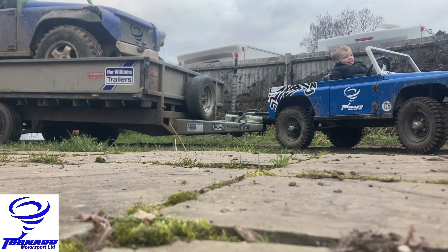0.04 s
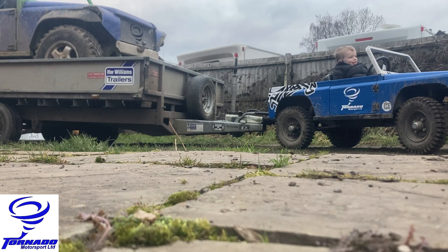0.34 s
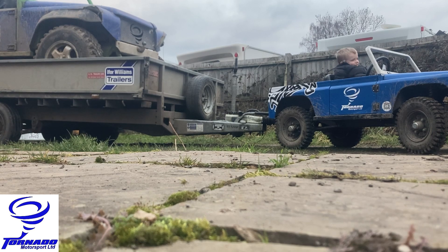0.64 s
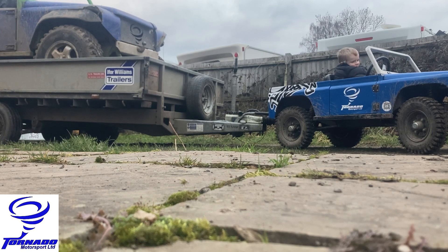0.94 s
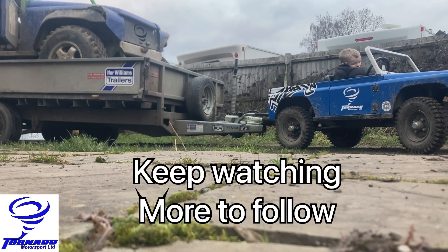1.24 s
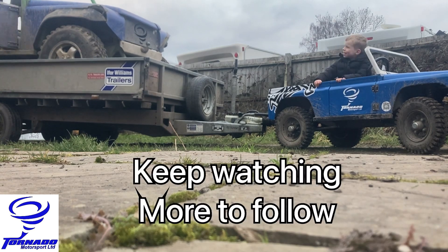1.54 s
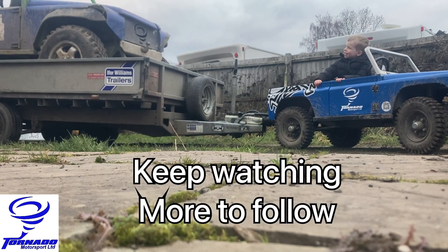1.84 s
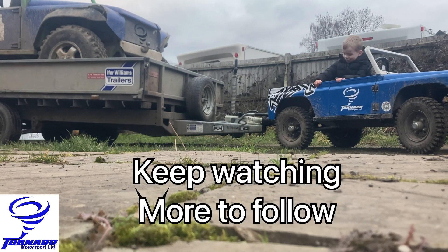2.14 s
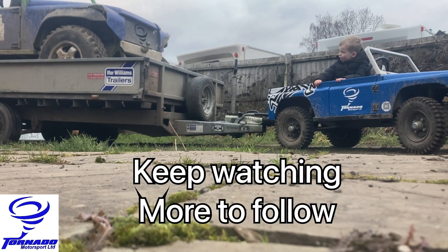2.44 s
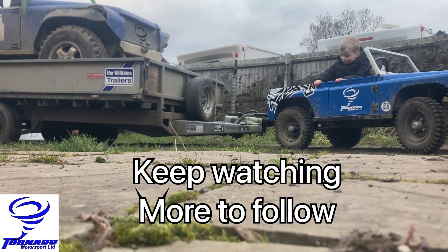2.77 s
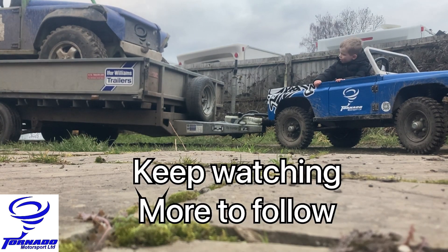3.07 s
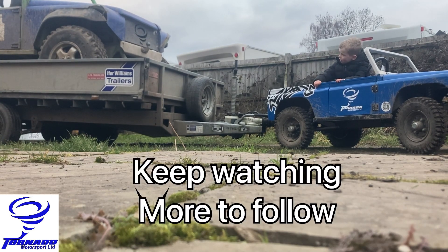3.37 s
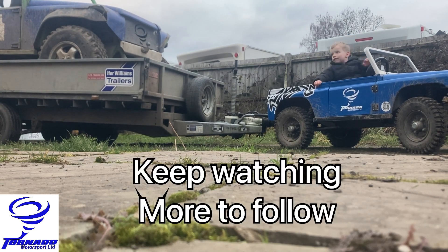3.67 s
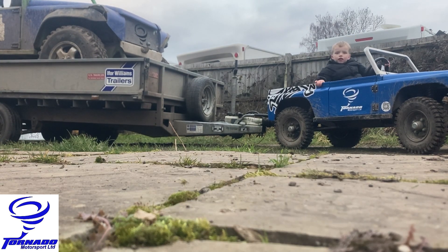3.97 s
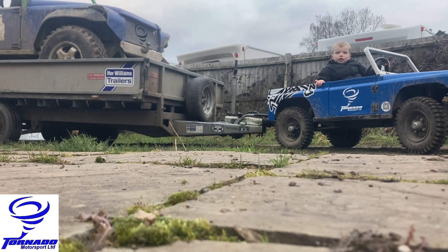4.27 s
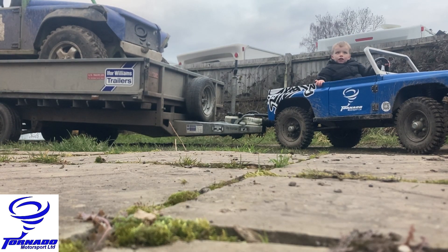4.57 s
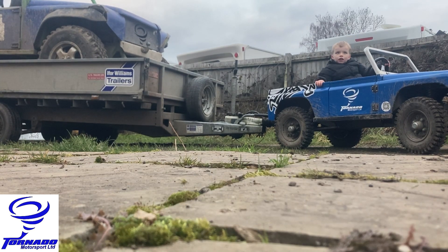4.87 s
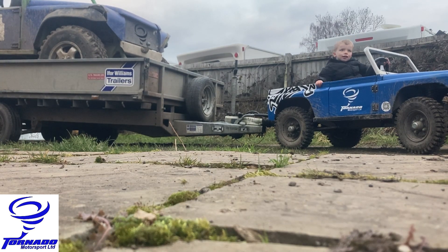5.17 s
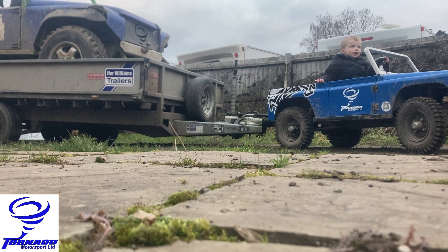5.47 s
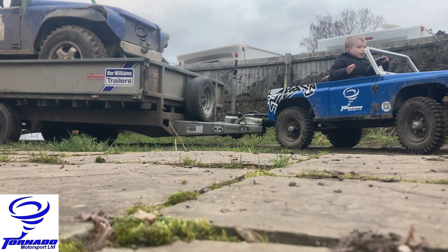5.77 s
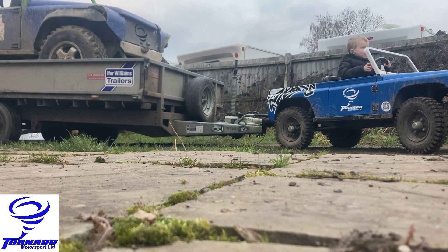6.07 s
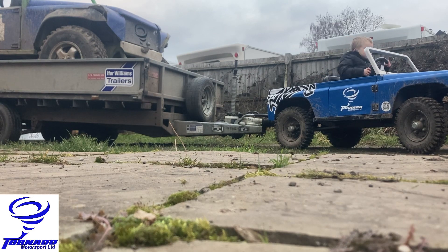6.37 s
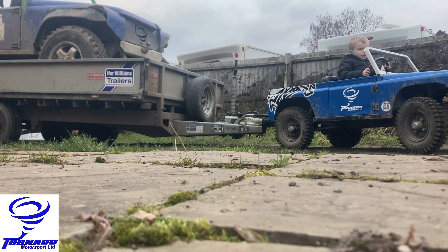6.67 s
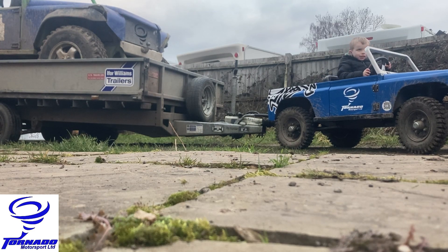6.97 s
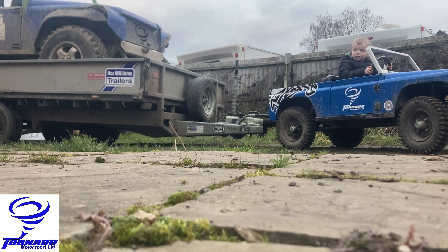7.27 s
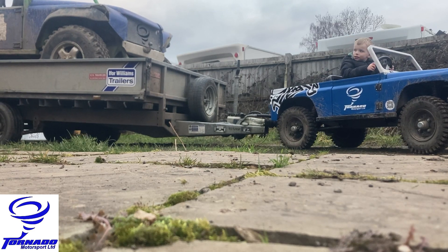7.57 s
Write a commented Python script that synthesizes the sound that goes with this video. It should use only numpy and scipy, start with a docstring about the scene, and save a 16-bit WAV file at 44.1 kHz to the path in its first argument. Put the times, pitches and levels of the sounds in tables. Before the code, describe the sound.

Outdoors, a clattering engine slows and dies with a brief squeal of dry metal. Small close clicks and squeaks follow, broken by a moment of total silence. A trailer hitch closes with a loud ringing clank and a grinding latch. Soft thumps, hollow knocks and scrapes come from a child's ride-on car against a low outdoor rumble. Finally it pulls away, gears humming and ticking, tyres crackling on gritty paving.

```python
"""An engine idles in a paved yard, is switched off, slows down and stops with a screech of dry metal.
Keys and catches click close by over a thin hiss, and early on all sound drops out for a moment.
A steel coupling clanks shut and its latch grinds home. Then, in the murmur of open air, come hollow
knocks, thumps and scuffs on the panels of a small ride-on car. Last, its electric motor takes up
the load of a trailer: the gears tick and hum, and the tyres crunch over grit."""
import sys
import numpy as np
from scipy import signal
from scipy.fft import rfft, irfft
from scipy.io import wavfile
from scipy.ndimage import uniform_filter1d

SR = 44100
rng = np.random.default_rng(int(sys.argv[2]) if len(sys.argv) > 2 else 0)


def inscribe(sig):
    """Save sig as 16-bit PCM at rate SR to the path in sys.argv[1].

    A 1-D sig is mono; a 2-D sig holds one channel per row.
    Samples are clipped to [-1, 1] before scaling.
    """
    pcm = np.round(np.clip(np.atleast_2d(sig).T, -1, 1) * 32767)
    wavfile.write(sys.argv[1], SR, pcm.astype(np.int16))


N = 336042
TIME, HZ = np.arange(N) / SR, np.fft.rfftfreq(N, 1 / SR)

# A fade_s is the time a sound takes to fall by 60 dB. Bass and treble are relative to the level.
# Puff strength of the four cylinders in turn: level_db
CYLINDERS = [-8, -18, -6.5, -14]
# Tone of the exhaust puffs: pitch_hz, level_db
EXHAUST_TONE = [(25, -23.5), (57, -6.5), (86, 7), (112, -6), (145, -1), (195, -14), (287, -13), (480, -17),
                (2000, -89)]
# Tone of the clattering engine block: pitch_hz, level_db
CLATTER_TONE = [(60, -7), (300, 7.5), (600, -2), (1200, -2), (1900, -5.5), (2600, -10.5), (3800, -15),
                (5700, -31.5), (8000, -24.5), (16000, -49)]
# Tone of the ticking valves: pitch_hz, level_db
VALVE_TONE = [(4000, -41), (9000, -18), (10000, -5), (11800, -6), (13200, -19), (16000, -23.5)]
# Hollow drone of the exhaust pipe as the engine slows: time_s, level_db
PIPE_DRONE = [(0.35, -39), (0.6, -38.5), (0.72, -38.5), (0.81, -51), (0.88, -35.5), (1.0, -54)]
# Ringing bands of dry, rubbing metal: pitch_hz, width_hz, level_db
SCREECH_BANDS = [(836, 120, -14), (1570, 680, -10), (2770, 310, -8.5), (3240, 490, 4), (4350, 410, -5.5),
                 (4870, 1200, -12.5), (9800, 13800, -9.5)]
# Tone of the thin background hiss: pitch_hz, level_db
HISS_TONE = [(59, -96), (100, -50.5), (239, -16), (535, -1), (1080, -12.5), (6990, -20), (12100, -34.5),
             (14700, -29), (16000, -40)]
# Keys, catches and a ratchet's teeth: start_s, level_db, treble_db, fade_s
CLICKS = [(1.0063, -37, -4, 0.2), (1.066, -36, -8, 0.54), (1.3802, -29.5, -0.5, 0.24),
          (1.4126, -32.5, -17, 0.18), (1.4557, -28.5, -8.5, 0.16), (1.473, -41.5, 7, 0.04),
          (1.5214, -31, -10.5, 0.1), (1.676, -33, -14, 0.24), (1.6996, -20.5, 5.5, 0.028),
          (1.7021, -21.5, 1.5, 0.041), (2.4814, -45.5, 4, 0.061), (2.5265, -36, -11.5, 0.22),
          (2.7928, -37.5, 2, 0.069), (3.183, -33.5, -0.5, 0.55), (3.538, -42, -2, 0.1),
          (3.6011, -30, -2.5, 0.05), (3.7197, -30, -11, 0.033), (3.728, -32.5, -20, 0.083),
          (3.7836, -34.5, -19, 0.1), (3.8595, -27, -32, 0.052), (3.927, -34.5, -26, 0.029),
          (3.9382, -29.5, -17.5, 0.047)]
# Short squeaks of dry metal: start_s, length_s, pitch_hz, level_db
SQUEAKS = [(1.049, 0.083, 1406, -41.5), (1.6, 0.02, 8900, -40), (1.645, 0.025, 3150, -39),
           (1.646, 0.021, 6260, -32), (1.672, 0.071, 982, -36), (2.893, 0.052, 1450, -27.5)]
# Blows on the coupling: start_s, level_db, bass_db, treble_db
COUPLING_BLOWS = [(2.833, -23.5, -9, -8.5), (2.8875, -22.5, -6, 7), (2.946, -10.5, -13.5, 1)]
# Notes the coupling rings with: pitch_hz, level_db, fade_s
COUPLING_NOTES = [(1406, -13, 0.35), (1782, -1.5, 0.17), (1924, -3, 0.16), (2836, 2, 0.22),
                  (3481, -3, 0.17), (3526, -2.5, 0.22), (4530, -16, .75), (5751, -9, 0.22),
                  (5950, -7.5, 0.12), (6420, -4.5, 0.15), (6500, -17, 0.36), (7224, -7, 0.17)]
# Blows of the closing latch: start_s, level_db, bass_db, treble_db
LATCH_BLOWS = [(3.284, -13.5, -7, -1), (3.301, -12.5, -18, -7), (3.318, -12.5, -23.5, -11)]
# Notes the latch rings with: pitch_hz, level_db, fade_s
LATCH_NOTES = [(1297, -25.5, 1.6), (1708, -3, 0.1), (2218, -4, .085), (2392, 2, 0.11), (2640, 3, .1),
               (2778, 1, 0.1), (3074, -5, .12), (3305, -17, .42), (3735, 5, 0.1), (3815, 0, .1)]
# Tone of the open air in the yard: pitch_hz, level_db
AIR_TONE = [(15, -55), (25, -5), (102, -4.5), (285, -14.5), (840, -19), (2000, -33.5), (4030, -44.5),
            (16000, -54.5)]
# Dull thumps of the car body: start_s, level_db, pitch_hz
THUMPS = [(4.077, -38.5, 92), (4.793, -41.5, 112), (5.224, -37.5, 189), (5.424, -24.5, 175.8)]
# Notes within one thump: pitch_multiple, level_db
THUMP_NOTES = [(1, 0), (1.7, -4.5), (2.5, -4), (3.6, -13.5)]
# Knocks on the panels, each spot with its own hollow note: start_s, level_db, treble_db, pitch_hz
KNOCKS = [(4.8303, -56, -5, 2570), (5.214, -48, -12.5, 565), (5.339, -50.5, -15.5, 1460),
          (5.6397, -40.5, -0.5, 1610), (5.8695, -38, -4.5, 1218), (5.9647, -42, -5.5, 1310),
          (6.0415, -32, 0.5, 1164), (6.1475, -43, -11, 1190)]
# Notes that all panel knocks share: pitch_hz, level_db, fade_s
PANEL_NOTES = [(391, -9, 0.28), (439.6, -1, 0.16), (567, -4.5, 0.14), (4310, -6, 0.033), (6910, -3, 0.026)]
# Scuffs on the car body: peak_s, level_db
SCUFFS = [(4.118, -41.5), (4.894, -41.5), (4.929, -47), (6.431, -51.5), (6.52, -46.5), (6.563, -41)]
# Tone of a scuff: pitch_hz, level_db
SCUFF_TONE = [(410, -1.5), (2000, -4), (5270, -10), (8800, -35), (14000, -28)]
# Load on the motor, given as the loudness of the gear hum: time_s, level_db
MOTOR_LOAD = [(6.83, -56), (7.02, -47), (7.08, -38), (7.105, -31), (7.29, -29), (7.345, -47), (7.47, -33),
              (7.52, -34), (7.59, -38)]
# Tone of the rolling car's rumble: pitch_hz, level_db
RUMBLE_TONE = [(24, -43), (40, -20), (290, -8), (420, -10.5), (550, -17.5), (1500, -40.5), (4000, -61),
               (8800, -77)]
# Tone of sand crackling under the tyres: pitch_hz, level_db
SAND_TONE = [(1500, 0), (3700, -1), (5700, -8), (7500, 4), (8800, -14), (10000, 1), (13000, -9),
             (15500, -28)]
# Gear ticks and tyre crunches as the car pulls away: start_s, level_db, treble_db
TICKS_AND_CRUNCHES = [(6.882, -40.5, -14.5), (6.9776, -51, 4), (7.051, -44.5, -1), (7.1255, -39.5, -8),
                      (7.4266, -34, -15.5), (7.5418, -32.5, -10.5), (7.588, -38.5, -2)]

ENGINE_END_S, AIR_START_S = 1.005, 4.076


def amp(db):
    """Turns decibels into a number to multiply a sound by."""
    return 10 ** (np.asarray(db) / 20)


def unit(x):
    """Scales a signal to an average strength (rms) of 1."""
    return x / np.sqrt(np.mean(x ** 2) + 1e-20)


def level_at(tone, hz):
    """The level in dB at any pitch, filled in between the rows of a tone table."""
    pitches, db = np.transpose(tone)
    return np.interp(np.log(hz + 1), np.log(pitches + 1), db)


def add(mix, start_s, sound):
    """Mixes a sound in at the given time."""
    part = mix[max(round(start_s * SR), 0):][:len(sound)]
    part += sound[:len(part)]


def colour(x, tone, size=4096):
    """Filters a sound to the given tone without smearing it earlier in time."""
    db = np.maximum(level_at(tone, abs(np.fft.fftfreq(size, 1 / SR))), -100)
    taps = np.fft.ifft(np.exp(np.conj(signal.hilbert(np.log(amp(db)))))).real
    return signal.oaconvolve(x, taps)[:len(x)]


def noise(tone):
    """Steady noise with the given tone."""
    return unit(irfft(rfft(rng.standard_normal(N)) * amp(level_at(tone, HZ)), N))


def wander(rate_hz):
    """A smooth random wobble, up to about the given rate."""
    return unit(irfft(rfft(rng.standard_normal(N)) * np.exp(-(HZ / rate_hz) ** 2), N))


def rasp(grain_db, rate_hz):
    """Noise broken into uneven grains."""
    return unit(rng.standard_normal(N) * amp(grain_db * wander(rate_hz)))


def resonate(x, hz, width_hz):
    """Makes a sound ring around a pitch that may move over time."""
    turn = np.exp(2j * np.pi * np.cumsum(hz) / SR)
    decay = np.exp(-np.pi * width_hz / SR)
    return unit((turn * signal.lfilter([1], [1, -2 * decay, decay * decay], x / turn)).real)


def place(x, lag_ms, left_db, echo_db, fade_s):
    """Puts a sound in stereo with scattered echoes; the right side hears it lag_ms later."""
    t = TIME[:SR // 2]
    tails = rng.standard_normal((2, len(t))) * amp(-60 * t / fade_s) * (t > .002)
    echoes = signal.oaconvolve(x[None], tails / np.linalg.norm(tails[0]), axes=1)[:, :N]
    right = irfft(rfft(x) * np.exp(-2j * np.pi * HZ * lag_ms / 1000), N)
    return (np.array([x, right]) + amp(echo_db) * echoes) * amp([[left_db / 2], [-left_db / 2]])


def firing_sounds(firings, off_s, uneven_db, block_fade_s=.045):
    """Each firing puffs into the exhaust and knocks the engine block in its cylinder's own way."""
    starts = np.flatnonzero(np.diff(np.floor(firings)))
    sizes = amp(uneven_db * rng.standard_normal(N)[:len(starts)])
    puffs, block, t = np.zeros(N), np.zeros(N), TIME[:SR // 10]
    for k, db in enumerate(CYLINDERS):
        pulses = np.zeros(N)
        pulses[starts[k::len(CYLINDERS)]] = sizes[k::len(CYLINDERS)]
        puffs += amp(db) * pulses
        knock = rng.standard_normal(len(t)) * amp(-60 * t / block_fade_s)
        block += signal.oaconvolve(pulses, knock)[:N]
    puffs, block = colour(puffs, EXHAUST_TONE), colour(block, CLATTER_TONE)
    return puffs / puffs[TIME < off_s].std(), block / block[TIME < off_s].std()


def engine(off_s=0.35, idle_hz=28.5, slowing_hz_per_s=17.5, lurch_hz=16.6, uneven_db=0.5):
    """The engine puffs, clatters and ticks; switched off, it chugs against the air it squeezes."""
    coast_s, running = np.maximum(TIME - off_s, 0), TIME < ENGINE_END_S
    turns_per_s = np.maximum(idle_hz - slowing_hz_per_s * coast_s, 0)
    firings = np.cumsum(2 * turns_per_s) / SR + .55  # two firings a turn
    puffs, block = firing_sounds(firings, off_s, uneven_db)
    lurch_db = 3 * np.cos(2 * np.pi * lurch_hz * coast_s) * np.minimum(coast_s * lurch_hz, 1)
    exhaust_gain = running * amp(-23 - 33.5 * coast_s + lurch_db)
    clatter_gain = running * amp(-28 - 15 * (1 - np.exp(-coast_s / 0.16)) + lurch_db)

    # without fuel the firm puffs give way to a loose shudder
    rough = np.interp(coast_s, [0, .12], [.35, 1.4])
    boom = (0.81 * puffs + rough * noise(EXHAUST_TONE)) / np.hypot(1, rough)
    drone_gain = running * (coast_s > 0) * amp(np.interp(TIME, *np.transpose(PIPE_DRONE)))
    drone = drone_gain * resonate(boom, hz=141 * (1 + 0.11 * wander(idle_hz)), width_hz=50)
    exhaust = place(exhaust_gain * boom + drone, lag_ms=0.188, left_db=.6, echo_db=-31, fade_s=0.21)

    # once a firing, loose parts shake and a valve snaps shut
    force = amp(uneven_db * wander(idle_hz))
    shake = force * (0.79 + np.exp(-(firings % 1) / 0.49))
    loose = 1.08 + rough
    rattle = (block + loose * shake * noise(CLATTER_TONE)) / np.hypot(1, loose)
    snaps = .15 + force * np.exp(-coast_s / .25) * np.exp(-((firings + .3) % 1) / .24)
    peak = clatter_gain.max()
    tick_gain = amp(-8) * peak * (clatter_gain / peak) ** 0.61
    clatter = clatter_gain * rattle + tick_gain * snaps * noise(VALVE_TONE)
    return exhaust + place(clatter, lag_ms=0.17, left_db=2.1, echo_db=-9, fade_s=0.15)


def screech(start_s=0.901, length_s=0.094, level_db=-21.5, sag=0.03):
    """Dry metal rubs as the engine comes to rest; its ringing wavers and sinks."""
    progress = np.clip((TIME - start_s) / length_s, 0, 1)
    judder = rasp(grain_db=4.5, rate_hz=350)
    rub = sum(amp(db) * resonate(judder, hz * (1 - sag * progress + 0.033 * wander(97)), width_hz)
              for hz, width_hz, db in SCREECH_BANDS)
    swell = amp(level_db) * progress ** 0.13 * (1 - progress ** 2)
    return place(swell * unit(rub), lag_ms=0.1, left_db=0.79, echo_db=-1.4, fade_s=0.068)


def thin_hiss(level_db=-52):
    """A faint, steady hiss lies under the clicks."""
    hiss = amp(level_db) * noise(HISS_TONE) * (TIME > ENGINE_END_S) * (TIME < AIR_START_S)
    return place(hiss, lag_ms=0, left_db=-.4, echo_db=-7.5, fade_s=0.29)


def blow(db, bass_db, treble_db, fade_s, bass_hz, rise_s, snap=0, grain_db=2):
    """One hit: a burst of tiny contacts that dies away, with an optional snap at the start."""
    t = TIME[:SR // 2]
    contacts = unit(rng.standard_normal(len(t)) * amp(grain_db * rng.standard_normal(len(t))))
    force = (amp(-60 * t / fade_s) + snap * amp(-60 * t / 0.023)) * (1 - np.exp(-t / rise_s))
    tone = [(bass_hz / 8, bass_db - 37.5), (bass_hz / 4, bass_db - 15),
            (bass_hz, bass_db + 18.5), (bass_hz * 1.77, bass_db + 18.5),
            (1400, 9), (3300, 7), (6000, treble_db + 5.5), (15000, treble_db - 0.5)]
    return amp(db) * colour(contacts * force, tone)


def keys_and_catches(waver_share=0.033):
    """Small metal parts make dry clicks and a few wavering squeaks."""
    out, waver = np.zeros(N), wander(300)
    mean_db = np.mean([db for _, db, _, _ in CLICKS])
    for start_s, db, treble_db, fade_s in CLICKS:
        bass_db = -10.5 + 0.57 * (db - mean_db)  # a harder click has more body
        click = blow(db - 2, bass_db, treble_db, fade_s, bass_hz=470, rise_s=0.00062, snap=0.98)
        add(out, start_s, click)
    for start_s, length_s, hz, db in SQUEAKS:
        pitch_hz = hz * (1 + waver_share * waver[round(start_s * SR):][:round(length_s * SR)])
        squeak = np.sin(2 * np.pi * np.cumsum(pitch_hz) / SR)
        add(out, start_s, amp(db) * squeak * signal.windows.tukey(len(squeak), .3))
    return place(out, lag_ms=0.03, left_db=1.4, echo_db=-21.5, fade_s=0.14)


def ring(notes, tremble_db):
    """A struck part rings with dying notes that tremble differently on every hit."""
    t = TIME[:SR]
    hz, db, fade_s = np.transpose(notes)[:, :, None]
    tremble = wander(70)[rng.integers(0, N - len(t), hz.shape) + np.arange(len(t))]
    waves = rng.choice([-1, 1], hz.shape) * np.sin(2 * np.pi * hz * t + tremble[::-1] / 2)
    gains = amp(db + tremble_db * tremble - 60 * t / fade_s)
    return (gains * waves).sum(0) / np.linalg.norm(amp(db))


def struck(blows, notes, crack_db, ring_db, crack_fade_s, bass_hz, rise_s):
    """Each blow makes a crack and sets the part ringing."""
    out = np.zeros(N)
    for start_s, db, bass_db, treble_db in blows:
        add(out, start_s, blow(db + crack_db, bass_db, treble_db, crack_fade_s, bass_hz, rise_s))
        add(out, start_s, amp(db + ring_db) * ring(notes, tremble_db=4))
    return out


def jangle(blows, low_hz, spacing_hz, gain_db, fade_s, count, scatter_db=2.5, tremble_db=2):
    """Loose steel rattles with many crowded notes; each blow favours different ones."""
    out, t = np.zeros(N), TIME[:SR // 3]
    hz = (low_hz + spacing_hz * (np.arange(count) + 2 * rng.random(count)))[:, None]
    fades_s = fade_s * amp(scatter_db * rng.uniform(-.5, 0.49, hz.shape))
    tremble = wander(90)[rng.integers(0, N - len(t), hz.shape) + np.arange(len(t))]
    waves = np.sin(2 * np.pi * (hz * t + rng.random(hz.shape)) + tremble / 2)
    waves *= amp(tremble_db * tremble[::-1] - 60 * t / fades_s) * (1 - np.exp(-t / .0008))
    for start_s, db, _, treble_db in blows:
        sizes = unit(amp(scatter_db * rng.standard_normal(count))) * rng.choice([-1, 1], count)
        tilt = amp(level_at([(3300, 0), (6000, treble_db), (15000, treble_db - 14)], hz[:, 0]))
        add(out, start_s, amp(db + gain_db) * (sizes * tilt) @ waves / np.sqrt(count))
    return out


def coupling():
    """The steel coupling drops home in three ringing blows."""
    out = struck(COUPLING_BLOWS, COUPLING_NOTES, crack_db=-5.5, ring_db=-1.5,
                 crack_fade_s=0.14, bass_hz=425.5, rise_s=0.00016)
    out += jangle(COUPLING_BLOWS, low_hz=901, spacing_hz=180, gain_db=0.5, fade_s=0.24, count=81)
    return place(out, lag_ms=0.035, left_db=3.1, echo_db=-17, fade_s=0.084)


def latch():
    """The latch grinds shut, each contact thinner and duller than the last."""
    out = struck(LATCH_BLOWS, LATCH_NOTES, crack_db=-4.5, ring_db=-0.5,
                 crack_fade_s=0.11, bass_hz=468, rise_s=0.00193)
    out += jangle(LATCH_BLOWS, low_hz=1004, spacing_hz=172, gain_db=-7.5, fade_s=0.16, count=36)
    return place(out, lag_ms=0.041, left_db=0.72, echo_db=-9, fade_s=0.02)


def open_air(level_db=-50.5, swell_db=1):
    """The low, slightly uneven murmur of the yard takes over from the hiss."""
    air = amp(level_db + swell_db * wander(27)) * noise(AIR_TONE) * (TIME > AIR_START_S)
    return place(air, lag_ms=-0.043, left_db=0.31, echo_db=-8, fade_s=0.35)


def car_panels(thump_fade_s=0.19, spot_fade_s=0.098, rattle_hz=1300, rattle_fade_s=0.14):
    """The little car's hollow panels knock and thump; each jolt sets loose parts rattling."""
    out = np.zeros(N)
    for start_s, db, treble_db, hz in KNOCKS:
        bass_db = 5 - 0.97 * treble_db  # the duller a knock, the deeper it sounds
        notes = PANEL_NOTES + [(hz, -3.5, spot_fade_s)]
        out += struck([(start_s, db, bass_db, treble_db)], notes, crack_db=-1.5, ring_db=4.5,
                      crack_fade_s=0.066, bass_hz=318, rise_s=0.00099)
    for start_s, db, hz in THUMPS:
        notes = [(k * hz, note_db, thump_fade_s / np.sqrt(k)) for k, note_db in THUMP_NOTES]
        add(out, start_s, amp(db) * ring(notes, tremble_db=6))
    jolts = [(s, db - 2) for s, db, _, _ in KNOCKS] + [(s, db - 17) for s, db, _ in THUMPS]
    shaking = sum((TIME > s) * amp(db - 60 * abs(TIME - s) / rattle_fade_s) for s, db in jolts)
    rattle = resonate(rasp(grain_db=6.8, rate_hz=240), np.full(N, rattle_hz), width_hz=1100)
    return place(out + shaking * rattle, lag_ms=-0.11, left_db=0.71, echo_db=-4.5, fade_s=0.22)


def scuffs(swell_db_per_s=480, release_db_per_s=315, squeak_db=-2):
    """Gritty scrapes on the panels swell and let go; uneven slips add a rough, wavering squeak."""
    pressure = sum(amp(db - np.maximum(swell_db_per_s * (s - TIME), release_db_per_s * (TIME - s)))
                   for s, db in SCUFFS)
    slips, grit = rasp(grain_db=5.5, rate_hz=300), amp(3 * wander(250))
    squeak = resonate(slips, hz=1750 * (1 + 0.14 * wander(68)), width_hz=900)
    scrape = unit(grit * noise(SCUFF_TONE) + amp(squeak_db) * squeak)
    return place(pressure * scrape, lag_ms=-0.11, left_db=0.18, echo_db=-3, fade_s=0.0086)


def rolling_car(rumble_gain, gravel_db=-12):
    """The car rumbles over gritty slabs; its gears tick and its tyres crunch as it pulls away."""
    stones = rasp(grain_db=4.5, rate_hz=200)
    gravel = resonate(stones, hz=1150 * (1 + 0.29 * wander(44)), width_hz=900)
    out = rumble_gain * (noise(RUMBLE_TONE) + amp(gravel_db) * gravel)
    for start_s, db, treble_db in TICKS_AND_CRUNCHES:
        add(out, start_s, blow(db, 0, treble_db, fade_s=0.091, bass_hz=500, rise_s=0.00091, snap=0.55))
    return out


def sand(level_db=-54.5, cracks_per_s=70, crack_s=0.0087):
    """Grains of sand crack and fade, making a flickering hiss on both sides."""
    cracks = rng.exponential(1, N) * (rng.random(N) < cracks_per_s / SR)
    flicker = unit(1 + signal.lfilter([1], [1, -np.exp(-1 / (crack_s * SR))], cracks))
    return amp(level_db) * flicker * np.array([noise(SAND_TONE), noise(SAND_TONE)])


def electric_drive(start_s=6.83, rise_s=0.026, gear_hz=304.2, whistle_hz=15500, full_load_db=-21):
    """The car pulls away: loaded gears hum, the tyres roll and the speed controller whistles."""
    load_db = np.interp(TIME, *np.transpose(MOTOR_LOAD))
    powered = np.clip((TIME - start_s) / rise_s, 0, 1)
    cycles = np.cumsum(gear_hz * (1 + 0.01 * wander(38.2))) / SR
    flutter = 1 + .4 * wander(80)
    gears = powered * amp(load_db) * unit(np.sin(2 * np.pi * cycles) * flutter)
    rolling = rolling_car(rumble_gain=powered * amp(-30.5 + 0.31 * (load_db - full_load_db)))
    crackle = powered * sand()
    whistle_gain = powered * amp(-70 + 3 * wander(15))
    whistle = whistle_gain * resonate(rng.standard_normal(N), np.full(N, whistle_hz), width_hz=220)
    car = place(gears + rolling + whistle, lag_ms=-0.12, left_db=0.85, echo_db=-12, fade_s=0.033)
    return car + crackle


def scene():
    """Adds up all the sounds in the order they are first heard."""
    return (engine() + screech() + thin_hiss() + keys_and_catches() + coupling() + latch()
            + open_air() + car_panels() + scuffs() + electric_drive())


def record(dry, gap_start_s=1.127, gap_end_s=1.379, top_hz=15900):
    """Drops the sound for a moment, softly squashes the loudest blows and cuts the highest treble."""
    audible = (TIME < gap_start_s) | (TIME > gap_end_s)
    gate = uniform_filter1d(audible.astype(float), size=40)
    squashed = .82 * np.tanh(dry * gate / .75)
    treble_cut = signal.firwin(255, top_hz, window=("kaiser", 9), fs=SR)
    return signal.oaconvolve(squashed, treble_cut[None], "same")


dry = scene()
out = record(dry)
inscribe(out)
```